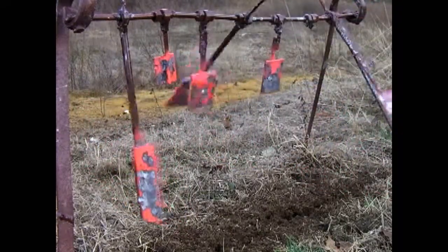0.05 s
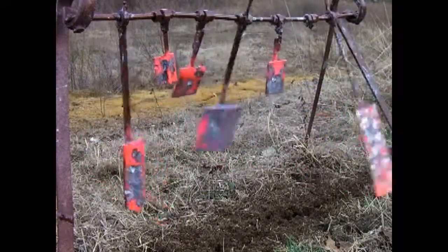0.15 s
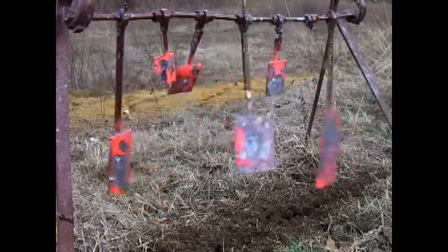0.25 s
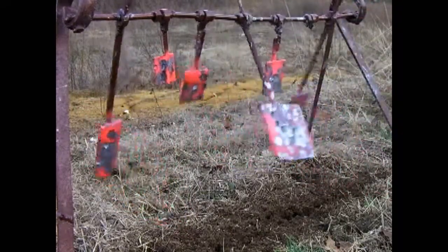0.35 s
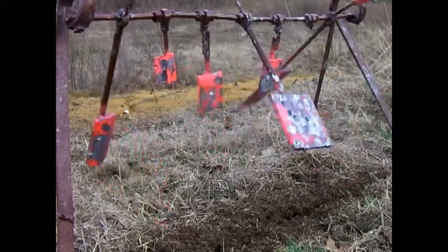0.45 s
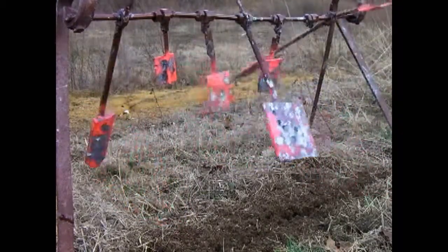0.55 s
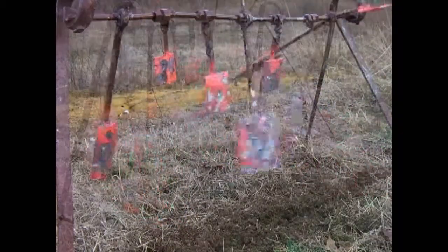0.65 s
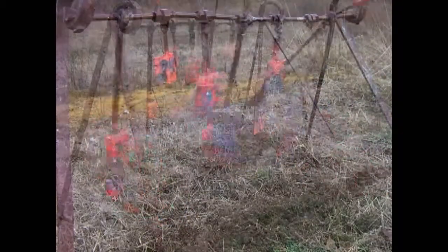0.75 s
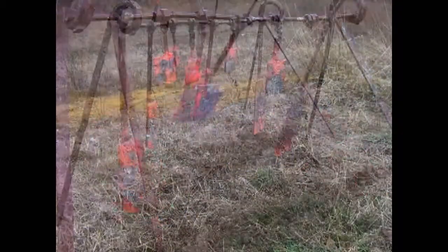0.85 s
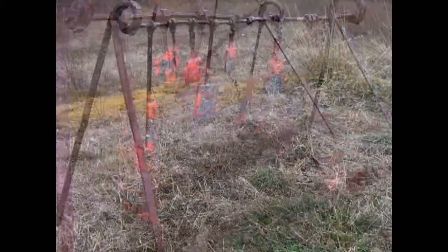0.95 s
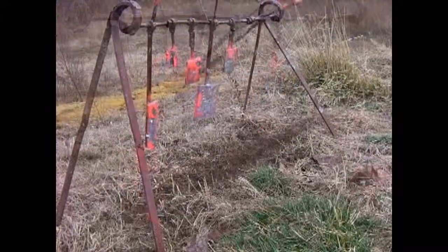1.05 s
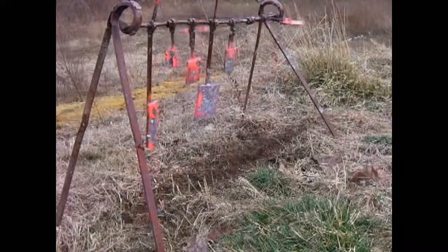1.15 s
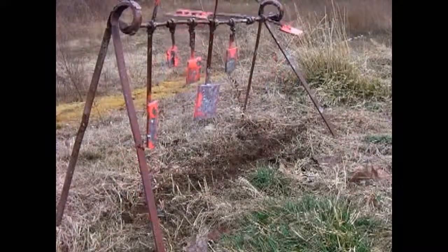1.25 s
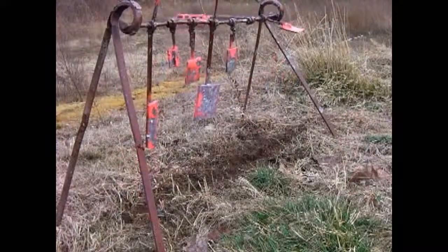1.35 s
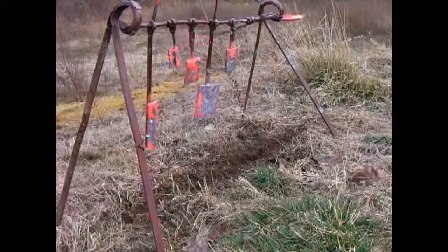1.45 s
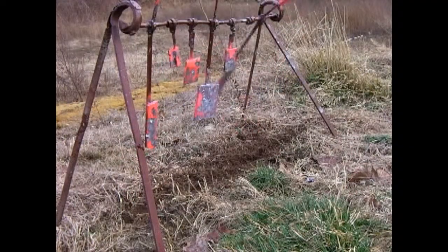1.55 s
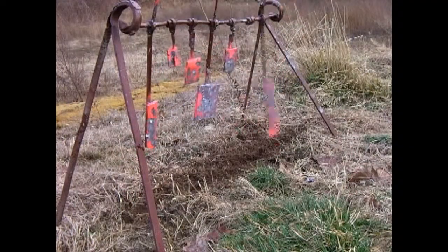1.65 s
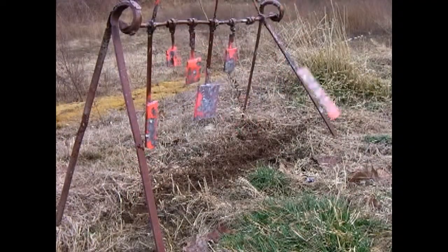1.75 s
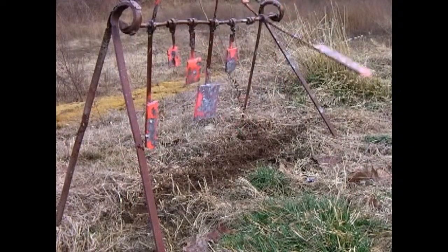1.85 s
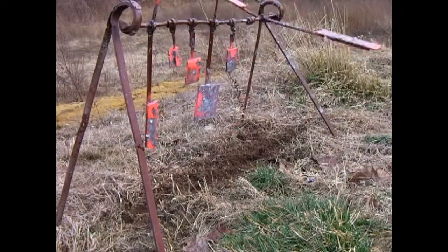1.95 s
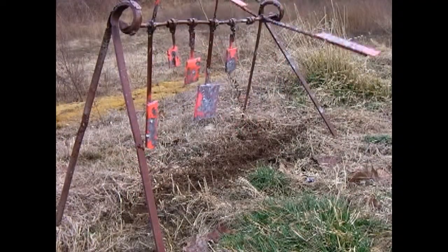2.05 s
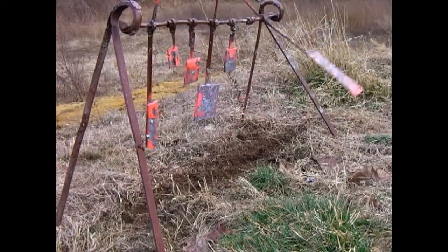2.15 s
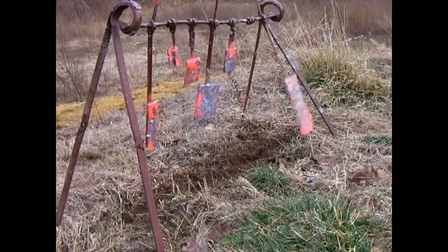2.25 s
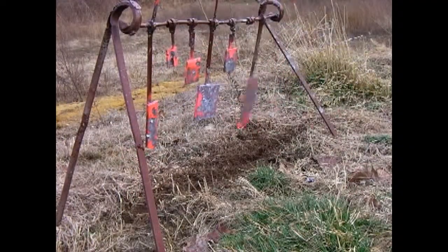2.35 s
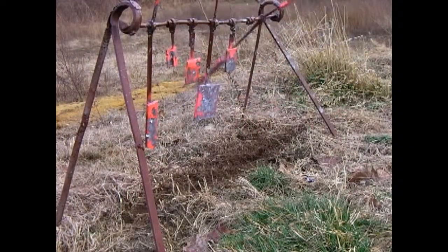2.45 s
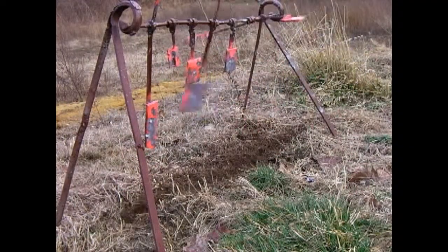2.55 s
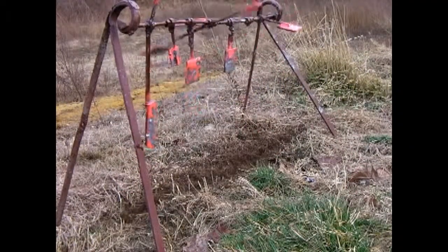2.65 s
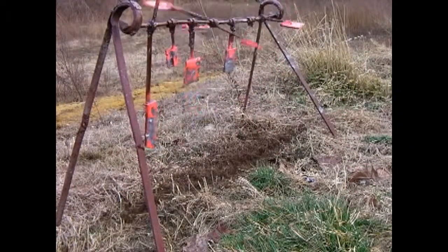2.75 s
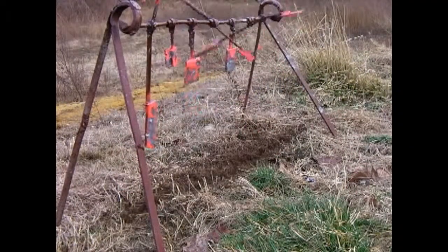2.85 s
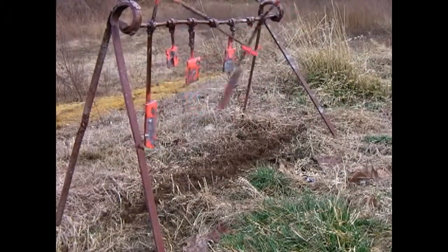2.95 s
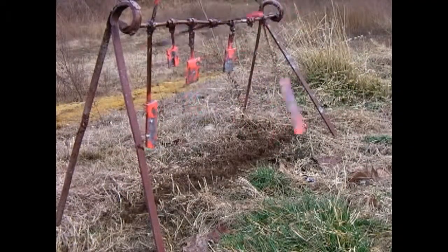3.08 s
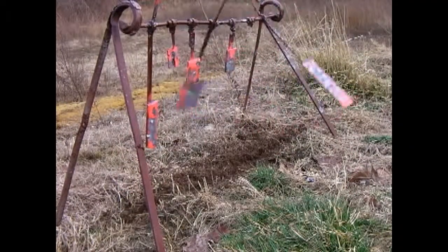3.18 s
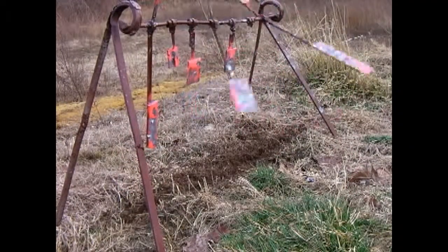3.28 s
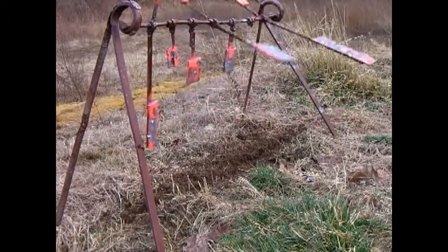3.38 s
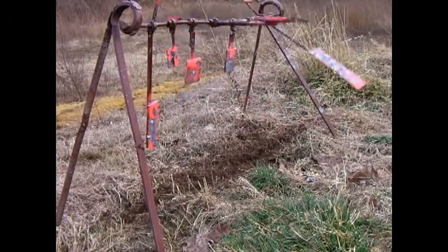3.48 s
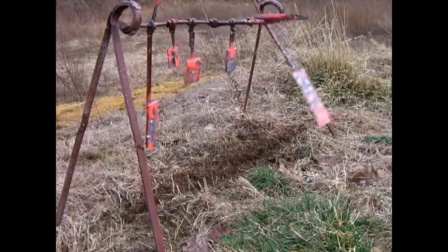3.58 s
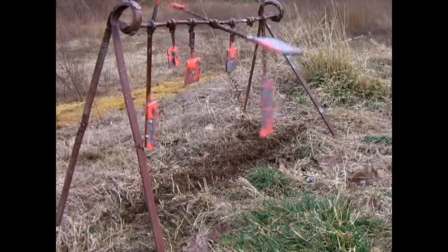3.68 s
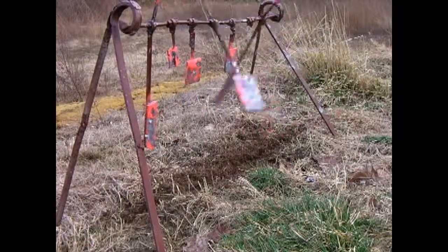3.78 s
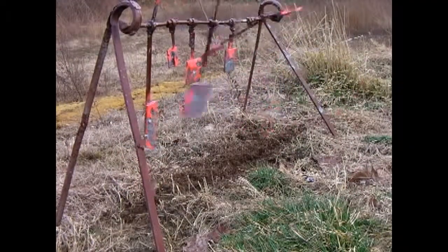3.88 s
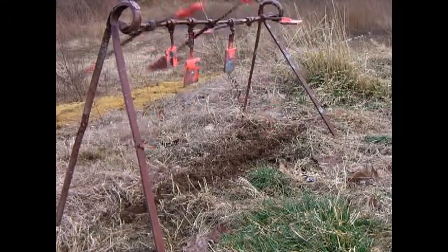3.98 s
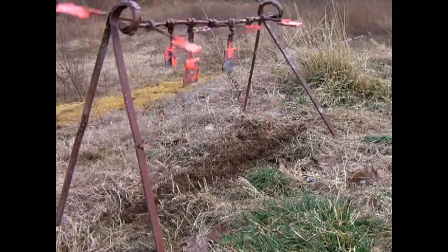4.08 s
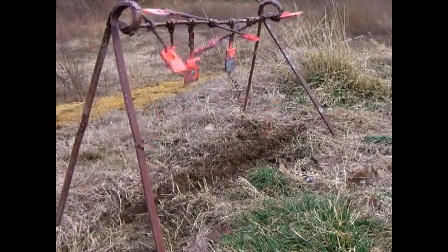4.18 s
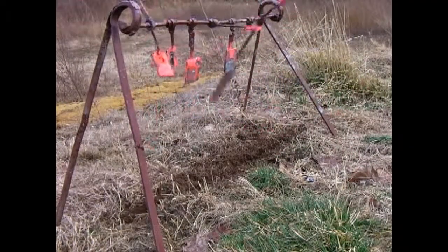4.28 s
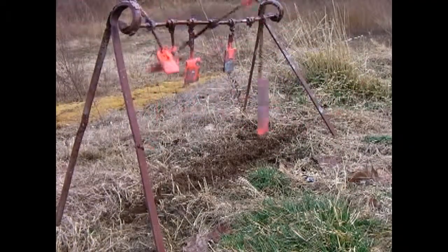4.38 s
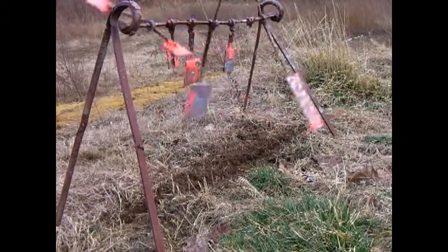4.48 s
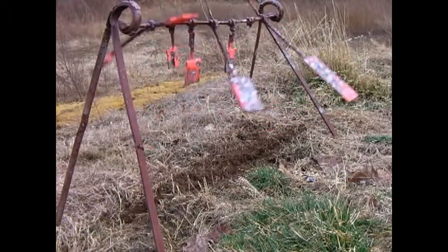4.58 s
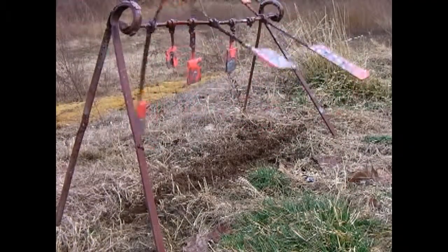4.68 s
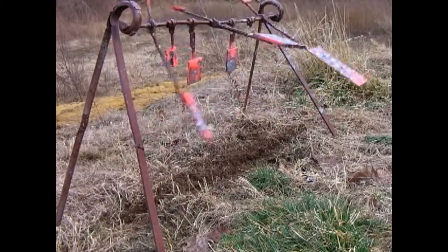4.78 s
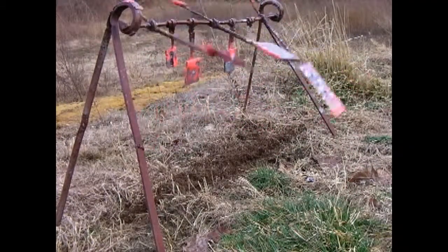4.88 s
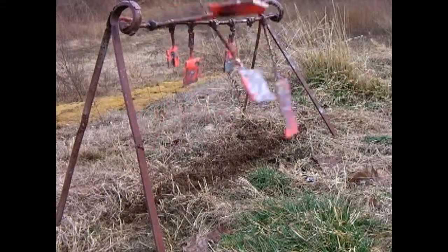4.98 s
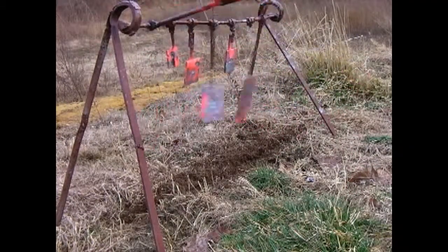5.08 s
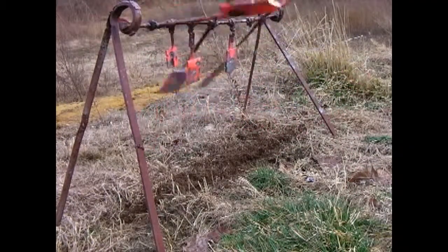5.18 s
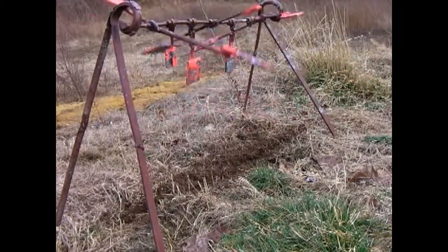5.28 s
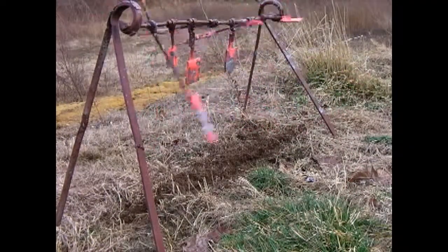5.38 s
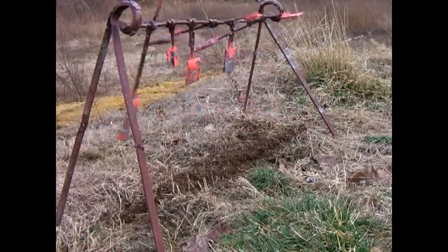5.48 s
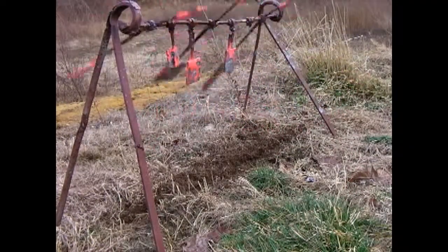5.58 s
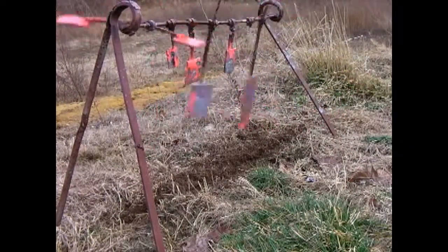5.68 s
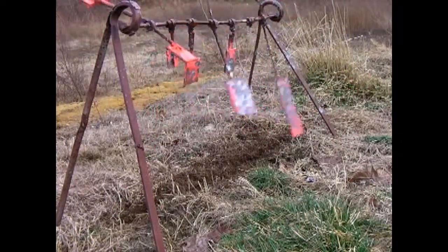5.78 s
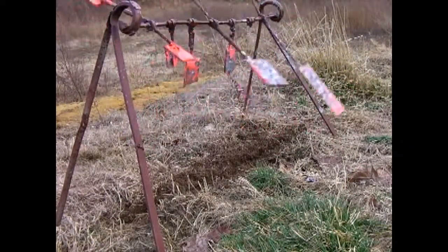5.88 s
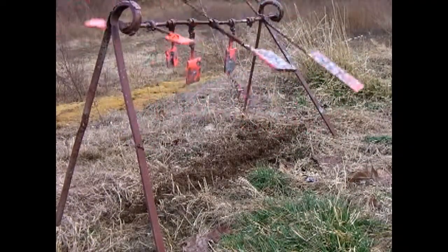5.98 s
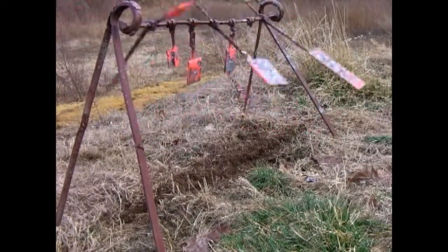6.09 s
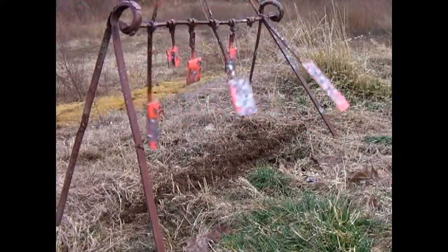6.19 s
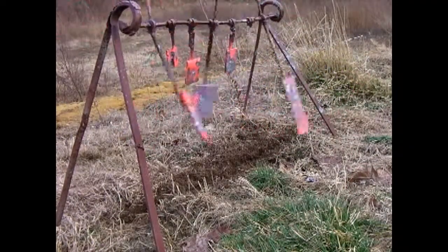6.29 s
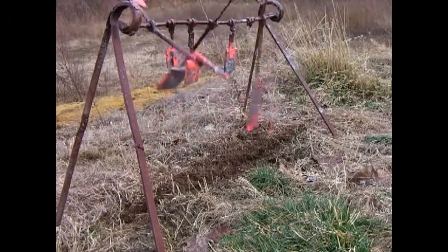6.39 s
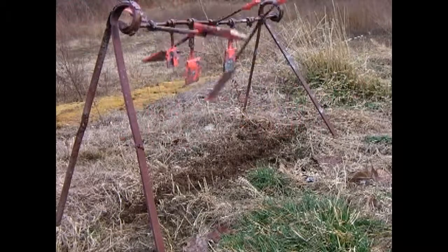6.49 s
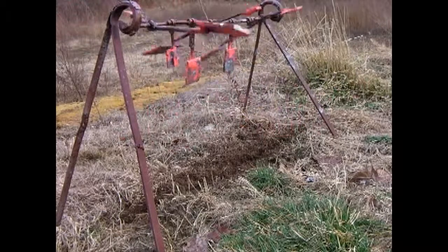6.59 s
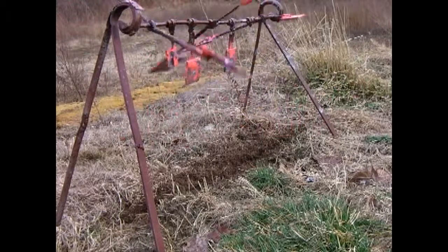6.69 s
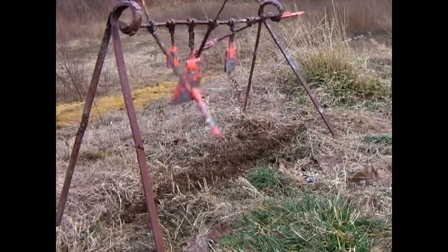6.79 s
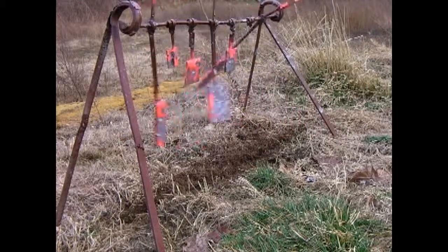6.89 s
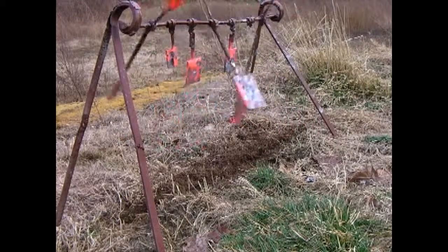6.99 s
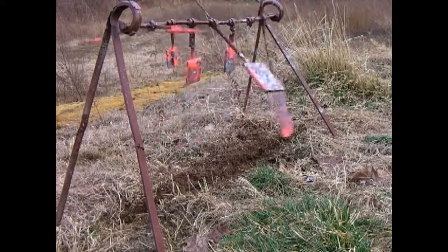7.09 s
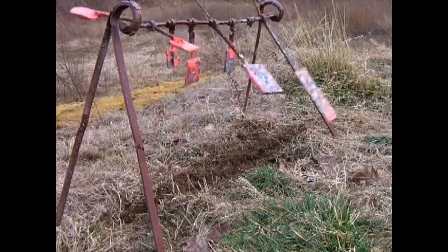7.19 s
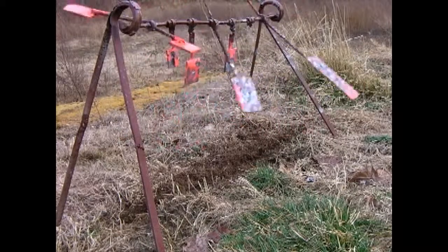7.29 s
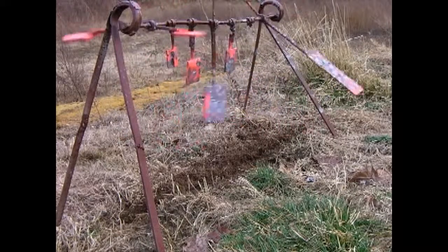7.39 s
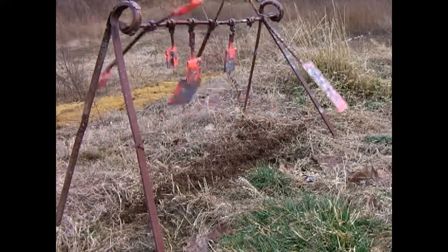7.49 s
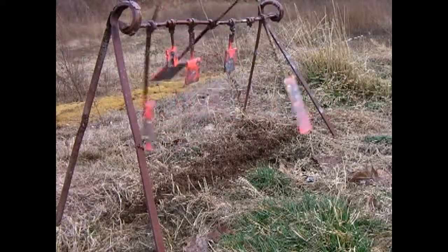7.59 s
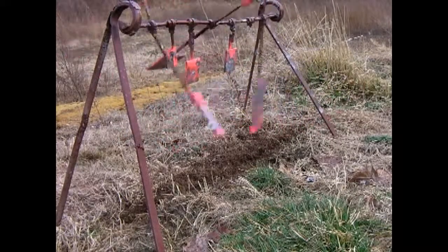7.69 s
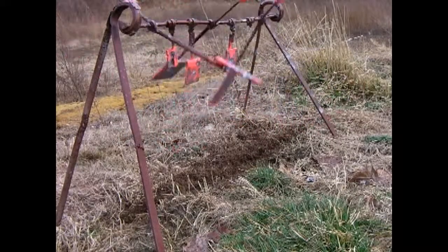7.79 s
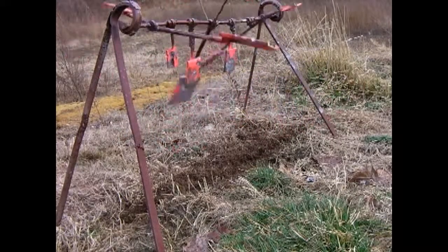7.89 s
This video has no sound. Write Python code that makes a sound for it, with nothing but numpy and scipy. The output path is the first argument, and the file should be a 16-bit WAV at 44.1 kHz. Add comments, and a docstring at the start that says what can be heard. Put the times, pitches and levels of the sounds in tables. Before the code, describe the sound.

Close to a steel target frame, pistol shots crack and clang on swinging plates, echoes rolling off trees, with small metallic knocks in between.

```python
"""Pistol shots on swinging steel plates

Four pistol shots in an open field, heard close to the steel frame that carries the plates.
Each bullet sets off shaped noise for the crash and damped sine modes for the ringing; the muzzle blast is a
noise burst that overloads the microphone, and delayed noise rolls back from the trees. Dull bumps come first;
plates clank on their hinges between shots, over a light breeze and quiet air. Shots come up in level early on.
"""
import sys
import numpy as np
from scipy import signal
from scipy.fft import rfft, irfft, next_fast_len
from scipy.io import wavfile
from scipy.ndimage import uniform_filter1d

SR = 44100
rng = np.random.default_rng(int(sys.argv[2]) if len(sys.argv) > 2 else 0)


def to_wav(s):
    """Save 16-bit WAV."""
    ch = np.atleast_2d(s).T  # columns
    pcm = np.round(np.clip(ch, -1, 1) * 32767)  # PCM
    wavfile.write(sys.argv[1], SR, pcm.astype(np.int16))


N = 350154
TIME = np.arange(N) / SR

# Colour of the quiet open air. Each row: frequency in Hz, relative density in dB.
AIR_COLOUR = [(30, -17), (120, -6), (280, -6.5), (520, -6), (800, -19.5), (1500, -21.5), (3000, -25.5),
              (6000, -27.5), (8000, -25), (10000, -27), (16000, -26)]
AIR_DB = -54

# Colour of the breeze, also lent to deep pushes and shudders. Each row: frequency in Hz, relative density in dB.
BREEZE_COLOUR = [(20, -8), (50, -2), (105, 7.5), (170, -1.5), (300, -22.5), (800, -38), (16000, -82.5)]
# A light, uneven breeze on the microphone
BREEZE_DB, BREEZE_SWING_DB, BREEZE_SWING_S, BREEZE_RISE_S = -50, 2, 0.12, 0.15
# Gusts that buffet the microphone. Each row: start in seconds, level in dB, time to fall 60 dB in seconds.
GUSTS = [(2.255, -38, 0.37), (2.345, -35.5, 0.18), (5.90, -38, 0.28), (6.03, -35, .15), (6.21, -32.5, .2),
         (6.32, -37.5, 0.28)]

# Dull bumps on the microphone. Each row: start in seconds, level in dB, time to fall 60 dB in seconds.
BUMPS = [(0.139, -29.5, 0.064), (0.315, -29.5, 0.14), (0.343, -27, 0.32), (0.410, -19.5, 0.26),
         (0.82, -22, 0.2)]
# Colour of the bumps. Each row: frequency in Hz, relative density in dB.
BUMP_COLOUR = [(25, -14), (60, -11), (115, 3), (200, -9.5), (300, -7.5), (410, 0), (560, -13.5), (800, -22),
               (1300, -38.5), (2500, -87), (16000, -80)]
SHUDDER_DB, SHUDDER_T60_S = -11.5, 0.56  # level is relative to the bump

# Plates knocking on their hinges. Each row: start in seconds, knock level in dB, ring level in dB (both
# before the trims in clanks), plate letter.
CLANKS = [(0.3242, -37.5, -58, "B"), (0.9118, -41, -54, "B"), (3.2829, -29, -42, "A"),
          (3.6711, -34, -35, "B"), (3.691, -18, -28, "C"), (3.9444, -26.5, -33.5, "B"),
          (4.9202, -40, -47, "C"), (5.1806, -27.5, -36.5, "B"), (5.5004, -36, -52, "D"),
          (5.7279, -33, -48, "B"), (5.8544, -31, -33, "B"), (6.3185, -40, -46, "B"),
          (6.4028, -44, -47, "B"), (7.2389, -27.5, -35, "D"), (7.2843, -34, -42, "C"),
          (7.8231, -23, -22.5, "C")]
# Colour of a hinge knock. Each row: frequency in Hz, relative density in dB.
CLANK_COLOUR = [(300, -31), (1500, -11), (3100, 4.5), (5500, 1), (7800, -5), (9200, -3.5), (13000, -13),
                (16000, -24)]
# Ring modes, one list per plate, A to D. Each row: frequency in Hz, relative level in dB,
# time to fall 60 dB in seconds.
PLATE_MODES = [
    [(3410, -3, .27), (3442, -14, .3), (4260, -12, .35), (4772, -1, .37), (6191, -9, .24), (9318, -12, .24),
     (13507, -5, .26)],
    [(3260, -18, .2), (3442, -12, .22), (4300, -17, .25), (5096, 0, .3), (6188, -14, .3), (7138, -9, .25),
     (9324, -9, .28), (10400, -20, .3), (11460, -20, .25)],
    [(2721, -15, .15), (4651, -11, .17), (5650, -10, .19), (6040, -13, .12), (6194, -1, .24),
     (6435, -14, .22), (8974, -15, .16), (9195, -12, .18)],
    [(4128, -8, .17), (4507, -13, .2), (5028, -7, .2), (5650, -12, .2), (6991, -11, .2), (9316, -3, .24),
     (12311, -9, .24), (12992, -12, .15), (13225, -7, .15)],
]
PLATE_NAMES = "ABCD"
# What the frame passes of a knock to the other plates. Each entry: relative level in dB, plates A to D.
SYMPATHY_DB = [-20.5, -14.5, -10, -9]
# After the third hit plate B jostles lightly at random; levels are before the trims in clanks
JOSTLE_FROM_S, JOSTLE_TO_S, JOSTLES_PER_S = 6.02, 6.28, 16
JOSTLE_DB, JOSTLE_RING_DB, JOSTLE_SPREAD_DB = -38, -53, 2

# Short, damped barks of the struck steel, before overload. Each row: start in seconds, frequency in Hz,
# level in dB, time to fall 60 dB in seconds.
BARKS = [(1.066, 1130, -16, 0.25), (1.067, 1474, -14, 0.27), (1.067, 3900, -18, 0.32),
         (2.673, 533, -13.5, .2), (2.708, 2740, -1, 0.073), (4.051, 1895, -2.5, 0.11),
         (6.492, 1607, -15, 0.05), (6.493, 3550, -18, 0.018)]
# Bullets on steel, before overload. Each row: start in seconds, crash level in dB, build-up in seconds,
# first touch against the top in dB, time to fall 60 dB in seconds, ring levels of plates A to D in dB.
STRIKES = [(1.068, -1.5, .06, -7.5, 0.42, -27, -0.5, -16, -6.5),
           (2.67, -3, 0.057, -30, 0.49, -2.5, -24.5, -6, 1),
           (4.032, 2.5, 0.04, -9, 0.4, -0.5, -22, -25.5, -34),
           (6.487, -4, 0.044, -40, 0.5, -32, -23.5, -31, -34)]
# Colour of the crash and the hanger ticks. Each row: frequency in Hz, relative density in dB.
CRASH_COLOUR = [(100, -14.5), (400, 1), (1200, -3.5), (2200, -2.5), (3200, 0.5), (5000, 1), (6500, 1),
                (7900, 1), (9200, 0), (13000, -1), (16000, -5.5)]

# Muzzle blasts, before overload. Each row: start in seconds, roar level in dB, hold in seconds, echo gain in dB.
BLASTS = [(1.075, -15.5, 0.026, -1), (2.685, -3, 0.015, 1), (4.041, -5.5, 0.054, 1.5),
          (6.507, 1.5, 0.033, 2)]
# Colour of the muzzle roar. Each row: frequency in Hz, relative density in dB.
BLAST_COLOUR = [(25, -16), (50, -16), (100, -7.5), (280, -7), (450, 2), (750, 1), (1100, -1.5),
                (1600, -8.5), (3200, -11.5), (8000, -17), (16000, -19.5)]

# Colour of the echoes. Each row: frequency in Hz, relative density in dB.
ECHO_COLOUR = [(30, -27.5), (100, -3), (200, -6.5), (300, -12), (420, 5), (700, 1), (1000, 1.5), (1500, -4),
               (2100, -1.5), (3200, -7), (5000, -8.5), (8000, -10.5), (16000, -9)]
# Slaps off the nearest trees and banks. Each row: delay in seconds, level in dB before the trim in field.
ECHOES = [(0.059, -15), (0.202, -12), (0.387, -15.5), (0.494, -16)]
# Nearby banks that return only the boom. Each row: delay in seconds, frequency in Hz, level in dB.
BOOMS = [(.055, 480, -4), (.118, 395, -10)]
# The trees behind scatter the blast, fainter with delay; level is before the trim in field
TREES_FROM_S, TREES_TO_S, TREES_PER_S = 0.42, 1.4, 20
TREE_DB, TREE_FALL_DB_PER_S, TREE_SPREAD_DB = -19, 9, 1
# The woods answer as one long roll that holds and dies away
ROLL_DB, ROLL_RISE_S, ROLL_HOLD_S, ROLL_T60_S = -23.5, 0.032, 0.53, 6.82
# Air absorption: dB per second of travel at 5 kHz, and the exponent of its growth with pitch
AIR_LOSS_DB, LOSS_SLOPE = 17, 1.55

# Fader on shots, struck steel and echoes. Each row: time in seconds, gain in dB.
FADE = [(1.08, -17.5), (1.25, -16), (1.55, -9.5), (2.3, -9.5), (2.65, -5.5)]

# Left-right likeness of distant sound. Each row: frequency in Hz, correlation from -1 to 1.
FAR_LIKENESS = [(50, .4), (300, .78), (1000, .78), (2500, .6), (6000, .4), (16000, .3)]
# Left-right likeness of steel and breeze. Each row: frequency in Hz, correlation from -1 to 1.
NEAR_LIKENESS = [(50, 0.14), (400, 1), (1200, 0.48), (3000, 0.574), (16000, 0.24)]
# Left-right likeness of the muzzle blast. Each row: frequency in Hz, correlation from -1 to 1.
BLAST_LIKENESS = [(50, .2), (400, .65), (1200, .4), (3000, .2), (16000, .2)]
CUTOFF_HZ = 15900


def from_db(db):
    """Turn decibels into an amplitude factor."""
    return 10 ** (np.asarray(db) / 20)


def curve(rows, t):
    """Read a breakpoint curve with straight lines between its points."""
    return np.interp(t, *np.transpose(rows))


def at_hz(points, hz):
    """Read a curve along a logarithmic frequency axis."""
    points = np.array(points)
    return np.interp(np.log(hz + 1), np.log(points[:, 0]), points[:, 1])


def noise(colour, likeness, size):
    """Stereo noise of rms 1 with a given spectrum and left-right likeness."""
    padded = next_fast_len(size)
    hz = np.fft.rfftfreq(padded, 1 / SR)
    mid, side = rfft(rng.standard_normal((2, padded)))
    alike = np.clip(at_hz(likeness, hz), -1, 1)
    pair = np.sqrt(1 + alike) * mid + np.sqrt(1 - alike) * side * [[1], [-1]]
    x = irfft(pair * from_db(at_hz(colour, hz)), padded)[:, :size]
    return x / x.std()


def burst(age, rise, hold, t60):
    """An envelope that rises, holds and dies away exponentially."""
    fall = np.clip((age - rise - hold) / t60, 0, 10)
    return np.clip(age / rise, 0, 1) * np.exp(-np.log(1000) * fall)


def add(out, s, x):
    """Mix a sound in from a given time."""
    start = max(round(s * SR), 0)
    out[..., start:start + x.shape[-1]] += x[..., :max(N - start, 0)]


def flutter(grain_s, size):
    """A random wobble of spread about 1, limited to +-2, with grains of a given length."""
    wobble = uniform_filter1d(rng.standard_normal(size), int(grain_s * SR))
    return np.clip(wobble / wobble.std(), -2, 2)


def scatter(start, end, per_s, spread_db, count=64):
    """Unevenly spaced events of uneven strength: (s, dB about their mean)."""
    chance = rng.uniform(-1, 1, (count, 2))
    times = start + (np.arange(count) + 0.5 + 0.5 * chance[:, 0]) / per_s
    levels = spread_db * np.sqrt(3) * chance[:, 1]
    return [(s, db) for s, db in zip(times, levels) if s < end]


def note(hz, db, rise, t60):
    """One damped partial, a little out of step between the two sides."""
    age = TIME[:SR // 4]
    phase = rng.uniform(0, 2 * np.pi) + rng.normal(0, 0.31, (2, 1))
    return from_db(db) * burst(age, rise, 0, t60) * np.sin(2 * np.pi * hz * age + phase)


def clangy(x, depth_db, life_s):
    """Narrow resonances stand out of a noise for a moment, each at its own pitch."""
    frames = signal.stft(x, SR, nperseg=512)[2]
    life_frames = round(life_s * SR / 256)
    strength = uniform_filter1d(rng.standard_normal(frames.shape[1:]), life_frames, axis=1)
    peaks = from_db(depth_db * np.clip(strength / strength.std(), -2, 2))
    y = signal.istft(frames * peaks, SR)[1][:, :x.shape[1]]
    return y / y.std()


def thuds(rows, colour, rise):
    """Soft pushes on the microphone, as enveloped noise."""
    out = np.zeros(N)
    for s, db, t60 in rows:
        add(out, s, from_db(db) * burst(TIME[:SR], rise, 0.00417, t60))
    return out * noise(colour, FAR_LIKENESS, N)


def quiet_air():
    """A steady bed of faint, wide noise for the open air."""
    return from_db(AIR_DB) * noise(AIR_COLOUR, FAR_LIKENESS, N)


def wind():
    """The breeze comes up, swells and sinks at random, with a few gusts pushing on the microphone."""
    swing_db = BREEZE_SWING_DB * flutter(BREEZE_SWING_S, N)
    level = from_db(BREEZE_DB + swing_db) * np.clip(TIME / BREEZE_RISE_S, 0, 1)
    breeze = level * noise(BREEZE_COLOUR, NEAR_LIKENESS, N)
    return breeze + thuds(GUSTS, BREEZE_COLOUR, rise=0.013)


def bumps():
    """Each bump is a short thud and a longer, deeper shudder."""
    shudders = [(s, db + SHUDDER_DB, SHUDDER_T60_S) for s, db, _ in BUMPS]
    return thuds(BUMPS, BUMP_COLOUR, rise=0.0028) + thuds(shudders, BREEZE_COLOUR, rise=0.0086)


def ringing(blows, waver):
    """Each blow (s, build-up s, dB per plate) rings the long modes; swinging makes them waver."""
    out, age = np.zeros((2, N)), TIME[:SR // 2]
    knots = np.linspace(0, age[-1], num=40)
    builds = {build for _, build, _ in blows}
    for number, modes in enumerate(PLATE_MODES):
        for hz, mode_db, t60 in modes:
            wander = rng.standard_normal((2, len(knots)))
            sway = waver * np.array([np.interp(age, knots, row) for row in wander])
            # the two sides are out of step
            phase = rng.uniform(0, 2 * np.pi) + np.array([[0], [np.pi * 0.8]]) * rng.uniform(-0.95, 1)
            # the sway moves both phase and loudness
            tone = np.sin(2 * np.pi * hz * age + phase + sway) * (1 + sway)
            rings = {build: tone * burst(age, build, 0, t60) for build in builds}
            for s, build, levels in blows:
                add(out, s, from_db(levels[number] + mode_db) * rings[build])
    return out


def clanks(knock_db=-10, ring_db=-6, knock_t60=0.13, rattle_db=1.0, clang_db=6):
    """A hinge rattles briefly; its plate sings on, the others more faintly through the frame."""
    jostles = scatter(JOSTLE_FROM_S, JOSTLE_TO_S, JOSTLES_PER_S, JOSTLE_SPREAD_DB)
    touches = CLANKS + [(s, JOSTLE_DB + db, JOSTLE_RING_DB + db, "B") for s, db in jostles]
    knocks, age, blows = np.zeros(N), TIME[:SR // 2], []
    for s, db, sing_db, plate in touches:
        add(knocks, s, from_db(db + knock_db) * burst(age, 0.00061, 0.0029, knock_t60))
        levels = [sing_db + (name != plate) * passed_db
                  for name, passed_db in zip(PLATE_NAMES, SYMPATHY_DB)]
        blows.append((s, 0.005, levels))
    knocks *= from_db(rattle_db * flutter(0.0017, N))
    hinge = clangy(noise(CLANK_COLOUR, NEAR_LIKENESS, N), depth_db=clang_db, life_s=0.08)
    return knocks * hinge + from_db(ring_db) * ringing(blows, waver=0.081)


def barks():
    """The struck steel gives short, heavily damped tones."""
    out = np.zeros((2, N))
    for s, hz, db, t60 in BARKS:
        add(out, s, note(hz, db, 0.00064, t60))
    return out


def crashes(split_hz=7500, treble_life=0.87, clang_db=7.0, crackle_db=2.0):
    """Countless short modes of plate and frame, heard as clangy noise, build up; the highest die first."""
    body, top, age = np.zeros(N), np.zeros(N), TIME[:SR]
    for s, db, build, touch_db, t60, *_ in STRIKES:
        swell = from_db(db + touch_db * np.clip(1 - age / build, 0, 1) ** 2)
        add(body, s, swell * burst(age, 0.003, build, t60))
        add(top, s, swell * burst(age, 0.002, build, t60 * treble_life))
    steel = clangy(noise(CRASH_COLOUR, NEAR_LIKENESS, N), depth_db=clang_db, life_s=0.06)
    steel *= from_db(crackle_db * flutter(0.00083, N))
    low = signal.sosfiltfilt(signal.butter(3, split_hz, fs=SR, output="sos"), steel)
    return body * low + top * (steel - low)


def ticks(per_s=9, tick_db=-56, spread_db=4, t60=0.025):
    """Once the plates swing, their hangers tick faintly at random."""
    touches = (rng.random(N) < per_s / SR) * (TIME > STRIKES[0][0])
    sizes = touches * from_db(tick_db + spread_db * np.clip(rng.standard_normal(N), -2, 2))
    level = signal.oaconvolve(sizes, burst(TIME[:SR // 10], 0.00067, 0, t60))[:N]
    return level * noise(CRASH_COLOUR, NEAR_LIKENESS, N)


def blasts(rise=0.0037, t60=0.15, thump_db=-12, thump_delay=0.0077, thump_t60=0.11):
    """The muzzle blast arrives as a dense roar, followed by a low push of air, equal for every shot."""
    roar, push, age = np.zeros(N), np.zeros(N), TIME[:SR]
    for s, db, hold, _ in BLASTS:
        add(roar, s, from_db(db) * burst(age, rise, hold, t60))
        add(push, s + thump_delay, from_db(thump_db) * burst(age, 0.0007, 0.0031, thump_t60))
    return roar * noise(BLAST_COLOUR, BLAST_LIKENESS, N) + push * noise(BREEZE_COLOUR, BLAST_LIKENESS, N)


def trees():
    """Echoes from scattered trees, the farther the fainter: (delay s, dB)."""
    return [(delay, TREE_DB + db - TREE_FALL_DB_PER_S * (delay - TREES_FROM_S))
            for delay, db in scatter(TREES_FROM_S, TREES_TO_S, TREES_PER_S, TREE_SPREAD_DB)]


def field(echo_db=1, echo_t60=0.086, echo_cut_hz=2400, boom_t60=0.035, clump_db=1.6):
    """The same trees answer every shot, so one pattern of echoes repeats; air dulls the late ones."""
    age = TIME[:3 * SR]
    clumps_db = clump_db * flutter(0.005, len(age)) * np.clip(age / 0.7, 0, 1)
    roll = from_db(ROLL_DB + clumps_db) * burst(age, ROLL_RISE_S, ROLL_HOLD_S, ROLL_T60_S)
    # the slaps share one noise, so their powers add
    power = sum((from_db(db + echo_db) * burst(age - delay, 0.0052, 0.0058, echo_t60)) ** 2
                for delay, db in ECHOES + trees())
    slaps = np.sqrt(power) * noise(ECHO_COLOUR, FAR_LIKENESS, len(age))
    # rough bark scatters the treble away
    dull = signal.butter(1, echo_cut_hz, fs=SR, output="sos")
    answer = roll * noise(ECHO_COLOUR, FAR_LIKENESS, len(age))
    answer += signal.sosfilt(dull, slaps)
    for delay, hz, db in BOOMS:
        add(answer, delay, note(hz, db, 0.0069, boom_t60))
    # absorption grows with path and pitch
    hz, delay, frames = signal.stft(answer, SR, nperseg=256)
    loss_db = AIR_LOSS_DB * (hz[:, None] / 5000) ** LOSS_SLOPE * delay
    answer = signal.istft(frames * from_db(-loss_db), SR)[1]
    out = np.zeros((2, N))
    for s, _, _, db in BLASTS:
        add(out, s, from_db(db) * answer)
    return out


def strike_ringing():
    """The plates' long modes swell up late in each crash, wavering strongly."""
    blows = [(s + build * 0.7, build, levels) for s, _, build, _, _, *levels in STRIKES]
    return ringing(blows, waver=0.51)


def overload(x, top=1.085):
    """The microphone bends peaks over smoothly and flattens them at its limit."""
    return x / (1 + np.abs(x / top) ** 6) ** (1 / 6)


def scene():
    """Shots, steel and echoes over the clanking frame, wind and quiet air."""
    steel = barks() + crashes() + strike_ringing()
    shots = overload(blasts() + steel + field())
    faded_shots = shots * from_db(curve(FADE, TIME))
    surroundings = quiet_air() + wind() + bumps() + clanks() + ticks()
    balance = from_db([[-0.4], [0.4]])  # left, right
    return (faded_shots + surroundings) * balance


def record(dry, notch_hz=7900, notch_q=14):
    """The microphone has a narrow dip in the treble; the top is cut steeply."""
    coloured = signal.lfilter(*signal.iirnotch(notch_hz, notch_q, fs=SR), dry)
    steep_cut = signal.ellip(12, 0.2, 70, CUTOFF_HZ, fs=SR, output="sos")
    return signal.sosfilt(steep_cut, coloured)


dry = scene()
out = record(dry)
to_wav(out)
```